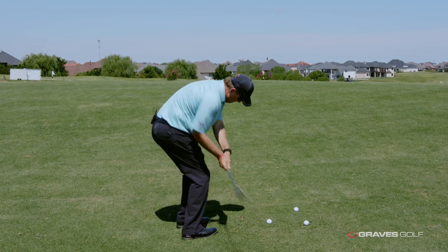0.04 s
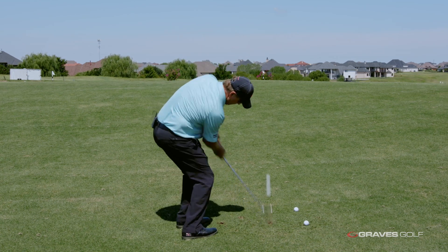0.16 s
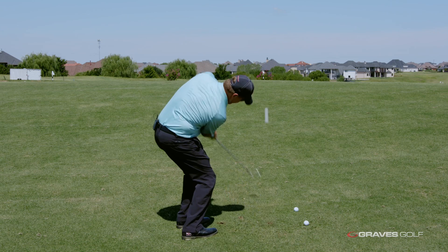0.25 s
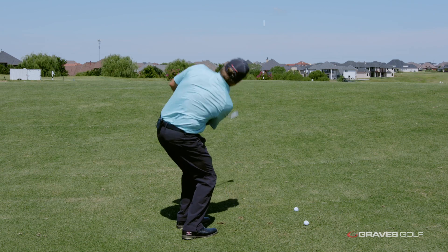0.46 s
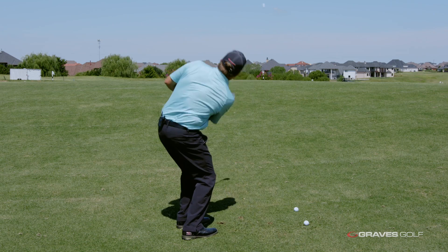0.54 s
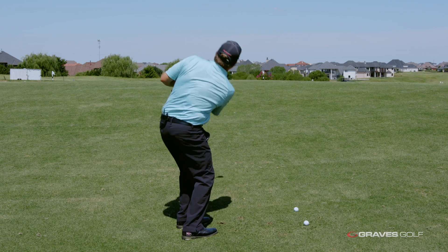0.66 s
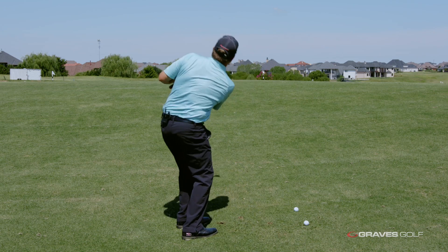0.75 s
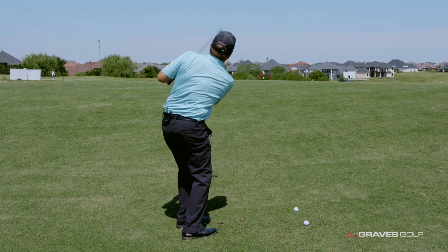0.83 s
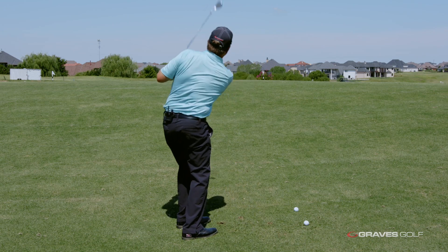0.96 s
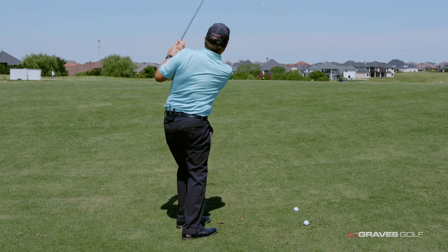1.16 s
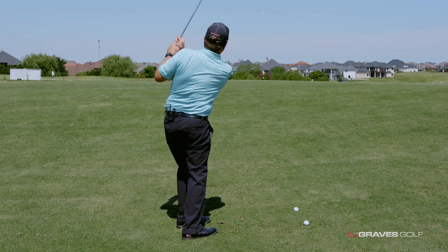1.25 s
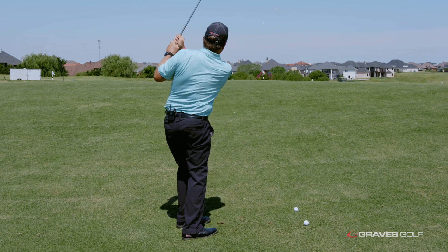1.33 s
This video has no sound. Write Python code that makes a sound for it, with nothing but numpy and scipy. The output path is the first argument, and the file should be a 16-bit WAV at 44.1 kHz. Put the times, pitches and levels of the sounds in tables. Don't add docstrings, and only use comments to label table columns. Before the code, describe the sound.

Single hard golf shot on grass: cloth rustle and soft low thumps lead into a very short bright crack, then a faint scatter of turf, light wind and distant hush, heard close from a small body-worn microphone.

```python
import sys
import numpy as np
from scipy import signal
from scipy.fft import rfft, irfft, next_fast_len
from scipy.io import wavfile
from scipy.ndimage import uniform_filter1d, map_coordinates

SR = 44100
rng = np.random.default_rng(int(sys.argv[2]) if len(sys.argv) > 2 else 0)


def store_wav(level_fs):
    pcm = np.round(np.clip(np.atleast_2d(level_fs), -1, 1) * 32767)
    wavfile.write(sys.argv[1], SR, pcm.T.astype(np.int16))


def level_to_linear(level):
    exponent = np.asarray(level, float) / 20
    return 10 ** exponent


N = 61739

STRIKE_S = .2668
# frequency in Hz, peak in dB, T60 in seconds,
# delay after the strike in ms, rise in ms.
HEAD_MODES = [(390, -30, .016, -1.8, 3), (560, -28, .024, -.6, 1.2), (1110, -14, .004, 1.72, .8),
              (1940, -13, .008, .74, .5), (2450, -16.5, .005, .68, .5), (3410, -14.5, .0165, 2.46, .22),
              (3640, -12, .015, 2.41, .22), (3950, -22, .005, .3, .3), (5700, -28, .006, .9, .3),
              (7600, -26, .006, 1.7, .25), (9170, -26, .006, 1.6, .25), (11900, -28, .006, 1.2, .4),
              (12640, -32, .006, 1.5, .3), (14200, -33, .007, 2, .3)]
# frequency in Hz, density in dB per Hz.
CRACK_COLOUR = [(88, -45.5), (150, -5.5), (1610, -12.5), (1910, -21), (2880, -14), (3710, -12),
                (4500, -6.5), (9240, -18), (15600, -30)]
CRACK_DB, CRACK_RISE_MS, CRACK_T60_S = -29, 1, .012
SPRAY_DB, SPRAY_T60_S = -31, .024
BRUSH_DB, BRUSH_MS = -42, 3

# frequency in Hz, density in dB per Hz.
TURF_COLOUR = [(300, -30), (600, -8.5), (900, -0.5), (1200, -9), (2100, -6.5), (4000, -15.5), (7000, -24),
               (15000, -27.5)]
DIVOT_S, DIVOT_RISE_S, DIVOT_FALL_S, DIVOT_DB = .334, .016, .015, -53

# time in seconds, effort in dB.
SWING_EFFORT = [
    (.17, -84),
    (.179, -58),
    (.222, -54.5),
    (.25, -58),
    (.266, -58),
    (.295, -59),
    (.335, -59),
    (.372, -66),
    (.42, -80),
]
# frequency in Hz, density in dB per Hz.
CLOTH_COLOUR = [(180, -34.5), (300, -2), (509, -9.5), (745, -7), (1110, -16), (1200, -23), (2110, -20.5),
                (2840, -22), (15600, -30.5)]
# time in seconds, effort in dB, fibre band in Hz.
TWIST_EFFORT = [
    (.43, -100, 6500),
    (.5, -85.5, 6540),
    (.58, -78.5, 7180),
    (.65, -76, 7940),
    (.7, -92, 7920),
]
TWIST_WIDTH_HZ, TWIST_BROAD_DB = 1600, 7
# start in seconds, peak in dB.
FIBRE_SNAPS = [
    (.012, -68.5),
    (0.026, -76),
    (.068, -68),
    (0.083, -59.5),
    (0.185, -57),
    (1.24, -62),
    (1.293, -58.5),
]
SNAP_HZ, SNAP_T60_S = 3600, 0.0071
# start in seconds, peak in dB,
# frequency in Hz (negative pushes the other way first), cycles of decay.
CAPSULE_PUSHES = [
    (0.1763, -38.5, 423, 1.1),
    (.2, -40.5, 500, 0.99),
    (.217, -23, -105, 0.7),
    (0.2633, -32, -120, .8),
    (0.265, -27.5, -230, 1.1),
    (.297, -37, 84, 1.4),
    (.33, -48.5, 894, 7.2),
    (.382, -50.5, 598, 1.5),
    (1.1149, -40.5, 247, 1.08),
    (1.12, -40.5, 93.5, 0.72),
]

# time in seconds, strength in dB.
WIND_STRENGTH = [(0.0, -50.5), (0.066, -54), (0.194, -48), (0.214, -42), (0.358, -48), (0.54, -49),
                 (0.564, -45), (0.618, -47.5), (1.016, -53.5), (1.034, -46), (1.086, -61.5), (1.128, -53),
                 (1.148, -53), (1.292, -54.5), (1.374, -49.5), (1.4, -63.5)]
# frequency in Hz, density in dB per Hz.
RUMBLE_COLOUR = [(12, -46), (20, -24), (46, -2.5), (76, 2), (123, -4.5), (296, -19), (352, -21.5),
                 (500, -32), (650, -64.5), (1100, -120)]
LUMPS_DB = 1.5
# frequency in Hz, density in dB per Hz.
HUSH_COLOUR = [(180, -30), (300, -7.5), (354, -13.5), (631, -12.5), (686, -13.5), (823, -13), (1000, -14.5),
               (5330, -27.5), (15600, -35)]
HUSH_DB, HUSH_RISE_DB = -68.5, 2
# start in seconds, end in seconds, centre in Hz, width in Hz, level in dB.
INSECT_BANDS = [
    (.9, 1.3, 5450, 430, -86),
    (1, 0.75, 8900, 500, -97),
]

TOP_HZ = 15750
# lower edge in Hz, flutter height (no unit) above which the band opens.
TREBLE_GATES = [
    (12800, -.25),
    (13800, .1),
    (14900, .75),
]
FLUTTER_HZ, OPEN_DB = 16.5, -62


def unit(x):
    return x / np.sqrt(np.mean(x ** 2) + 1e-20)


def curves(rows):
    s, *columns = np.transpose(rows)
    return [np.interp(np.arange(N) / SR, s, column) for column in columns]


def wobble(rate):
    knots = rng.standard_normal(200)
    return map_coordinates(knots, [np.arange(N) * np.clip(rate, .1, 120) / SR])


def noise(colour, patchy_db=0):
    z = signal.stft(rng.standard_normal(N + 1024), nperseg=512)[2]
    patches = uniform_filter1d(rng.standard_normal(z.shape), size=6, axis=0)
    patches = uniform_filter1d(patches, size=8, axis=1)
    x = signal.istft(z * level_to_linear(patchy_db * unit(patches)), nperseg=512)[1][:N]
    m = next_fast_len(N + 8192)
    hz, db = np.transpose(colour)
    bins_hz = np.fft.rfftfreq(m, 1 / SR)
    gain = level_to_linear(np.interp(np.log(bins_hz + 1), np.log(hz + 1), db))
    return unit(irfft(rfft(x, m) * gain, m)[:N])


def since(s):
    return np.clip(np.arange(N) / SR - s, 0, None)


def burst(u, rise, t60):
    env = (1 - np.exp(-u / rise)) ** 2 * level_to_linear(-60 * u / t60)
    return env / env.max()


def head_ring():
    out = np.zeros(N)
    for hz, db, t60, delay_ms, rise_ms in HEAD_MODES:
        u = since(STRIKE_S + delay_ms / 1000)
        out += level_to_linear(db) * burst(u, rise_ms / 1000, t60) * np.sin(2 * np.pi * hz * u)
    return out


def strike():
    u = since(STRIKE_S)
    before = np.clip(STRIKE_S - np.arange(N) / SR, 0, None)
    crack = level_to_linear(CRACK_DB) * burst(u, CRACK_RISE_MS / 1000, CRACK_T60_S) * noise(CRACK_COLOUR)
    spray = level_to_linear(SPRAY_DB) * burst(u, 0.0016, SPRAY_T60_S)
    brush = level_to_linear(BRUSH_DB) * np.exp(-before / BRUSH_MS * 1000 - u / .002)
    grit = noise([(500, -5.5), (2500, 1.5), (5500, -5), (9500, -0.5), (15000, -16)])
    return head_ring() + crack + (spray + brush) * grit


def divot():
    t = np.arange(N) / SR - DIVOT_S
    swell = np.exp(-.5 * (t / np.where(t < 0, DIVOT_RISE_S, DIVOT_FALL_S)) ** 2)
    return level_to_linear(DIVOT_DB + 1.1 * wobble(90)) * swell * noise(TURF_COLOUR, patchy_db=.8)


def rustle():
    effort_db, = curves(SWING_EFFORT)
    return level_to_linear(effort_db + 1.3 * wobble(70) + 1.4 * wobble(115)) * noise(CLOTH_COLOUR, patchy_db=1.4)


def twist():
    effort_db, hz = curves(TWIST_EFFORT)
    fuzz = noise([(1, 0), (TWIST_WIDTH_HZ / 2, -3), (TWIST_WIDTH_HZ, -40)], patchy_db=2)
    hiss = 1.4 * fuzz * np.sin(2 * np.pi * np.cumsum(hz) / SR)
    scrape = level_to_linear(TWIST_BROAD_DB) * noise(TURF_COLOUR, patchy_db=.8)
    return level_to_linear(effort_db) * (hiss + scrape)


def fibre_snaps():
    fibre = noise([(SNAP_HZ / 3, -12), (SNAP_HZ, 0), (SNAP_HZ * 1.5, -8), (SNAP_HZ * 4, -22)])
    return sum(level_to_linear(db) * burst(since(s), .0004, SNAP_T60_S) for s, db in FIBRE_SNAPS) * fibre


def capsule_pushes():
    out = np.zeros(N)
    for s, db, hz, cycles in CAPSULE_PUSHES:
        u = since(s)
        env = np.exp(-u * abs(hz) / cycles) * (1 - np.exp(-u * abs(hz) * 8))
        out += level_to_linear(db) * np.sin(2 * np.pi * hz * u) * env
    return out


def wind():
    strength_db, = curves(WIND_STRENGTH)
    return level_to_linear(strength_db) * unit(level_to_linear(LUMPS_DB * wobble(17)) * noise(RUMBLE_COLOUR, patchy_db=-0.5))


def insects():
    t, out = np.arange(N) / SR, np.zeros(N)
    for start, end, hz, width, db in INSECT_BANDS:
        swell = np.clip(np.minimum(t - start, end - t) / 0.024, 0, 1)
        band = noise([(hz - 2 * width, -50), (hz - width / 2, 0), (hz + width / 2, 0), (hz + 2 * width, -50)])
        out += level_to_linear(db + 3.6 * wobble(31)) * swell * band
    return out


def hush():
    level_db = HUSH_DB + HUSH_RISE_DB * np.arange(N) / N + .4 * wobble(4.9)
    return level_to_linear(level_db) * noise(HUSH_COLOUR, patchy_db=.7)


def scene():
    shirt = rustle() + twist() + fibre_snaps() + capsule_pushes()
    return (strike() + divot() + shirt + wind() + insects() + hush())[None]


def flutter_treble(x):
    m = next_fast_len(N + 8192)
    z, hz = rfft(x, m), np.fft.rfftfreq(m, 1 / SR)
    treble = irfft(z * (hz > 5000), m)[:N]
    busy = uniform_filter1d(treble ** 2, size=1500) > level_to_linear(2 * OPEN_DB - 12)
    flutter = np.sin(2 * np.pi * FLUTTER_HZ * np.arange(N) / SR + 1.2 * wobble(6)) + .35 * wobble(20)
    out = irfft(z * (hz < TREBLE_GATES[0][0]), m)[:N]
    upper_edges = [row[0] for row in TREBLE_GATES[1:]] + [TOP_HZ]
    for (lo, need), hi in zip(TREBLE_GATES, upper_edges):
        gate = uniform_filter1d(1. * (busy | (flutter > need)), size=400)
        out += gate * irfft(z * (hz >= lo) * (hz < hi), m)[:N]
    return out


def low_pass(x):
    return signal.sosfilt(signal.butter(12, 15760, fs=SR, output="sos"), x)


def record(dry):
    return low_pass(flutter_treble(dry[0])[None])


dry = scene()
out = record(dry)
store_wav(out)
```